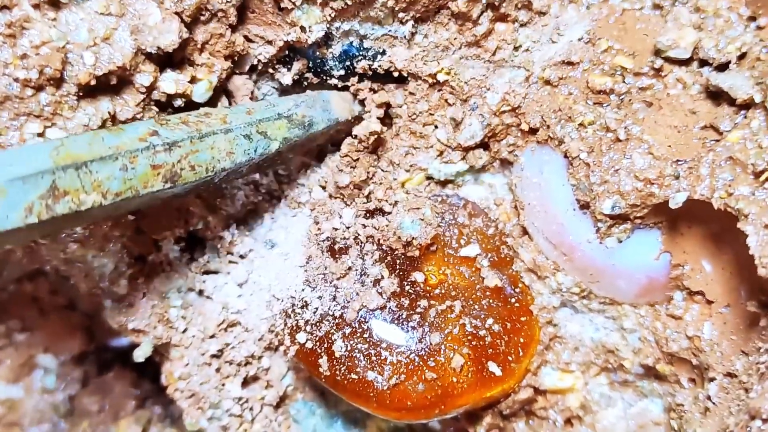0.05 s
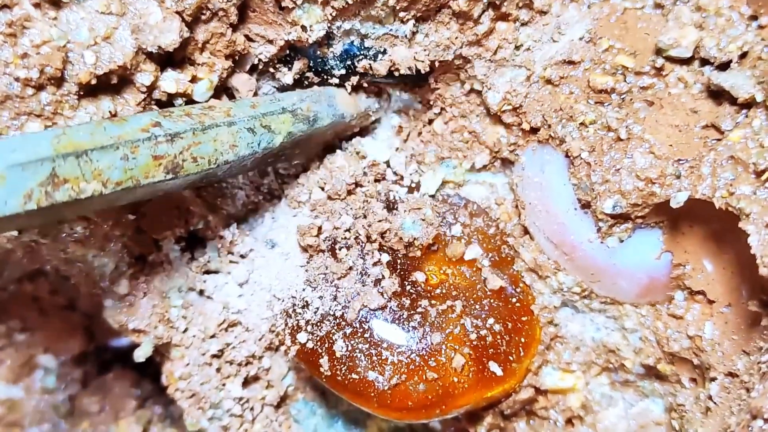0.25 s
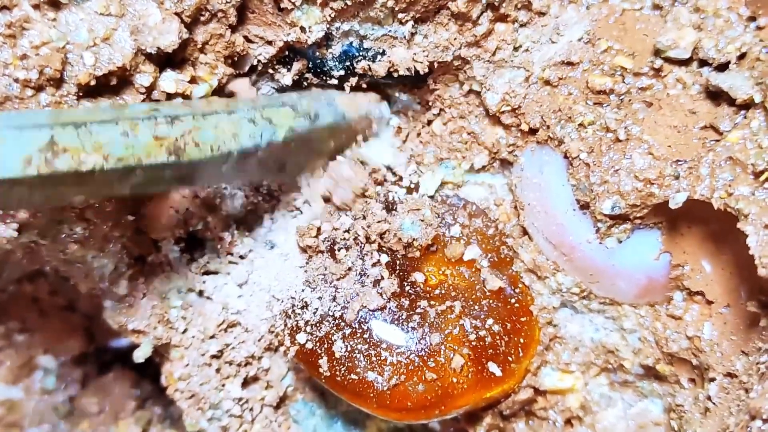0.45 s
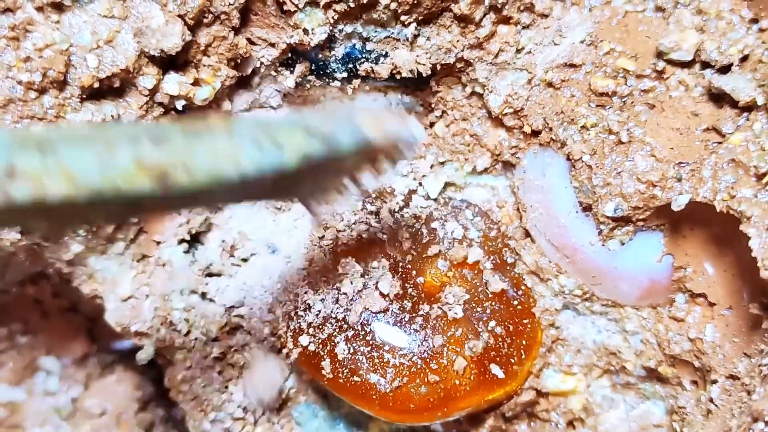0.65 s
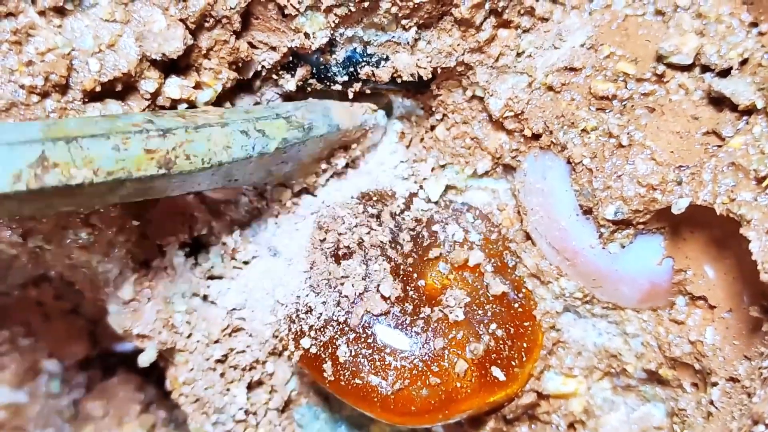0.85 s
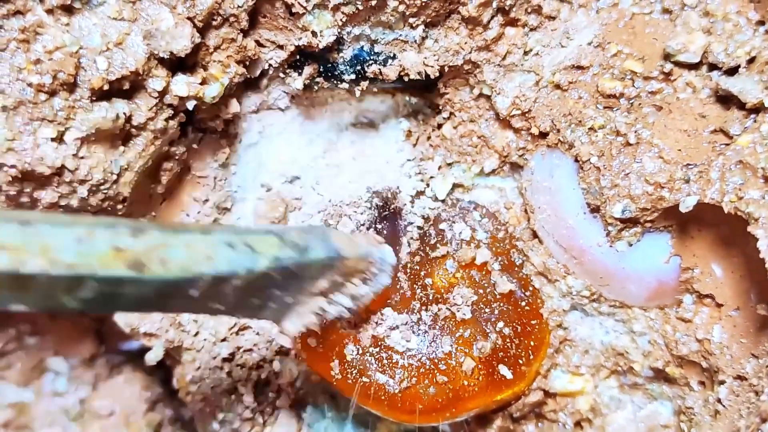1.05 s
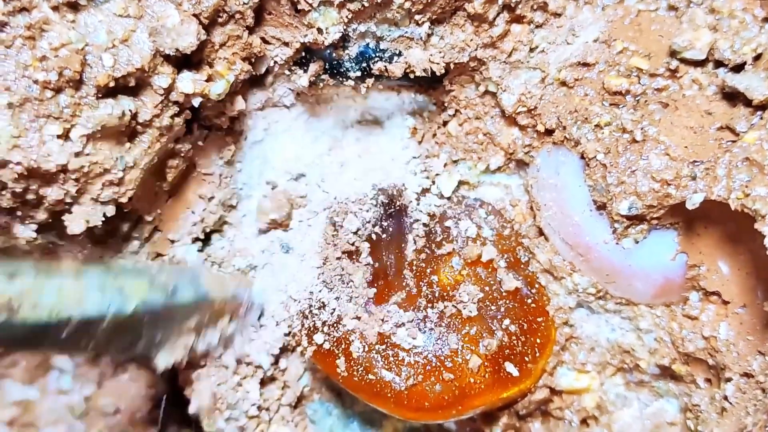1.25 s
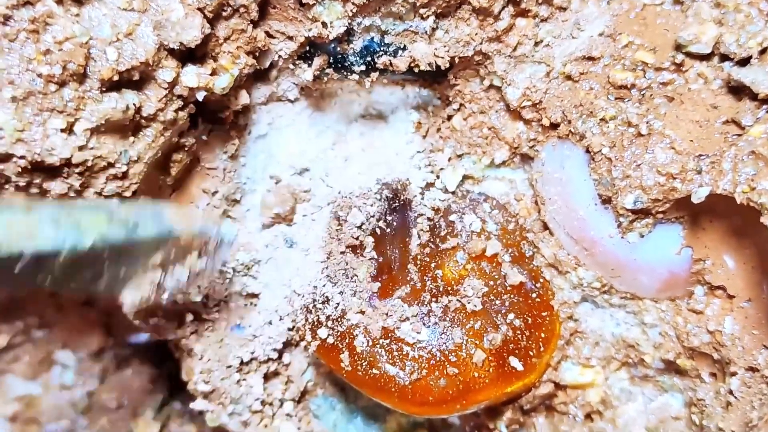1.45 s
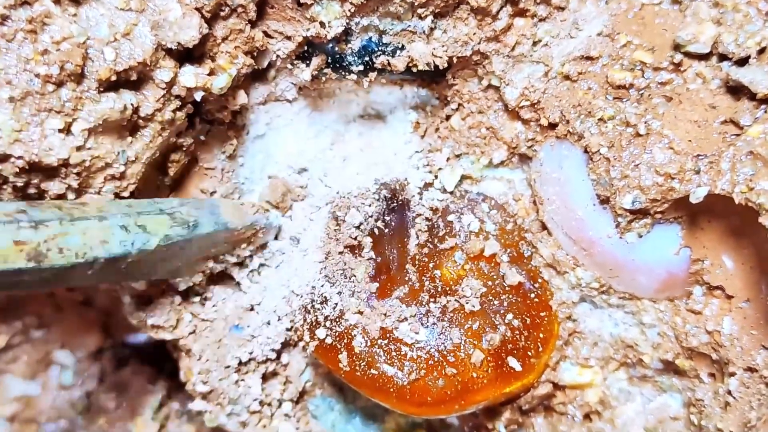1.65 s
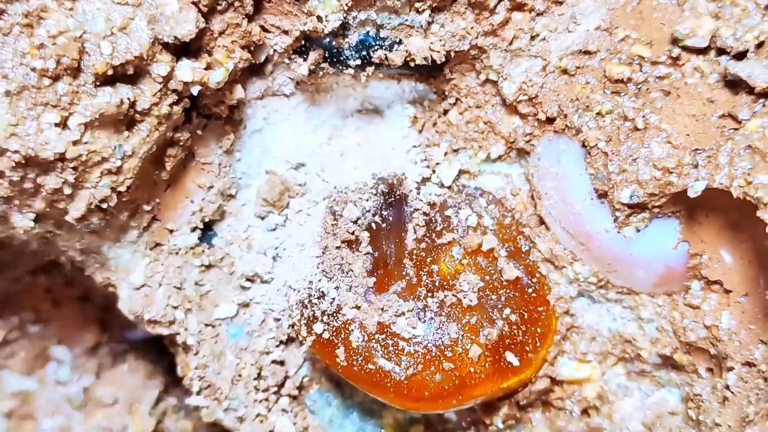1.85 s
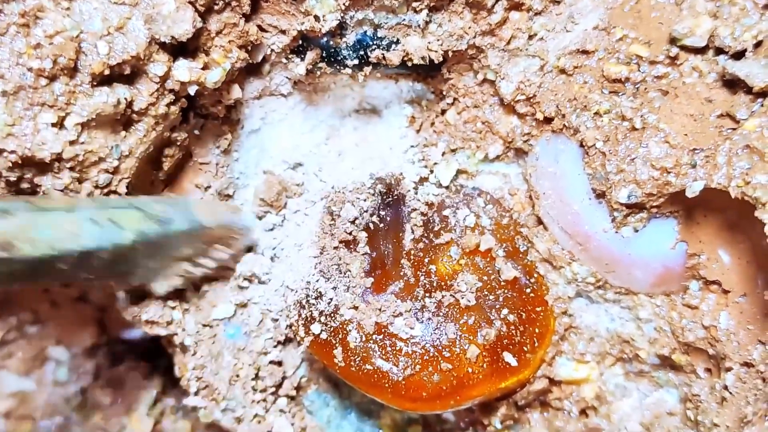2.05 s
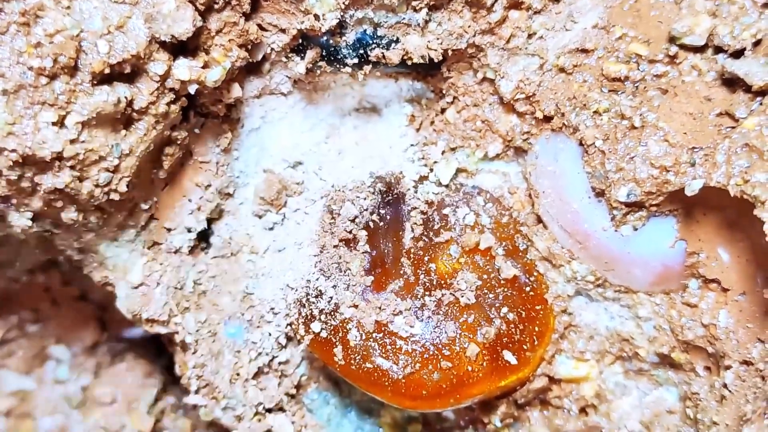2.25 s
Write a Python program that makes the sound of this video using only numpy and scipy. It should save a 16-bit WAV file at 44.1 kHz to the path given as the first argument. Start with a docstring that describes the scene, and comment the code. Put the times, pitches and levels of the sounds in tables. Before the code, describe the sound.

A metal pick crunches through dry dirt with a low thump from the stone beneath. A brush sweeps grit in short strokes, then the tool knocks and chatters over the rock with bright ticks, close up in a quiet room.

```python
"""Picking and brushing dirt off stone

Close up in a quiet, faintly humming room, a steel pick cracks a crust of dry dirt and the
stone slab under it booms. A brush sweeps the grit away in short strokes, snapping loose
grains. A tool knocks and chatters across the rock with bright ticks, and a pebble clinks."""
import sys
import numpy as np
from scipy import signal
from scipy.fft import rfft, irfft
from scipy.io import wavfile

SR = 44100
rng = np.random.default_rng(int(sys.argv[2]) if len(sys.argv) > 2 else 0)


def digitize_waveform(pressure):
    """Quantize a signal to 16-bit integers and store it at the path in sys.argv[1].

    Rows of a 2-D input are taken as channels; values are limited to [-1, 1].
    """
    field = np.atleast_2d(pressure).T
    bounded = np.clip(field, -1, 1)
    quanta = np.round(bounded * 32767).astype(np.int16)
    wavfile.write(sys.argv[1], SR, quanta)


N = 105840
T = np.arange(N) / SR  # seconds into the scene
AGE = T[:SR // 2]  # seconds into one short sound


def amp(db):
    """Turns decibels into a number to multiply by."""
    return 10 ** (np.asarray(db) / 20)


def at_pitch(points, hz):
    """Looks up a table's value at the given frequencies."""
    pitches, values = np.transpose(points)
    return np.interp(np.log(hz + 1), np.log(pitches), values)


def add(mix, start, sound):
    """Lays a sound into the mix, start seconds in."""
    part = mix[max(round(start * SR), 0):][:len(sound)]
    part += sound[:len(part)]


def fade(t60):
    """Dies away by 60 dB in t60 seconds, the 'fade time'."""
    return np.exp(-np.log(1000) * AGE / t60)


def colour(x, tone, size=2048):
    """Makes some pitches stronger than others, as a tone table says."""
    log_gain = np.log(amp(at_pitch(tone, abs(np.fft.fftfreq(size, 1 / SR)))))
    spectrum = np.exp(np.conj(signal.hilbert(log_gain)))  # nothing sounds before its cause
    taps = np.fft.ifft(spectrum).real[:size // 2]
    return signal.fftconvolve(x, taps / np.linalg.norm(taps))[:N]


def cut_bass(x, hz, order):
    """Weakens everything below hz."""
    return signal.sosfilt(signal.butter(order, hz, "high", fs=SR, output="sos"), x)


def burst(t60):
    """A dying cluster of tiny breaks."""
    return rng.choice([-1., 1.], len(AGE)) * (.5 + rng.random(len(AGE))) * fade(t60)


def grains(per_s, spread_db):
    """A random stream of clicks of uneven size."""
    clicks = (rng.random(N) < per_s / SR) * rng.choice([-1., 1.], N)
    clicks *= amp(spread_db * np.minimum(rng.exponential(1, N), 4))
    return clicks / clicks.std()


def push(seconds, rise_s=0.0001):
    """A quick shove of pressure and its slow rebound."""
    progress = AGE / seconds
    return (progress - 1) * np.exp(-progress) * (1 - np.exp(-AGE / rise_s))


def ring(notes):
    """The fading notes of something struck."""
    return -sum(amp(db) * fade(t60) * np.sin(2 * np.pi * hz * AGE) for hz, db, t60 in notes)


def chip(x, hz, ring_db=1):
    """A chip of stone adds its own brief ring to the sound that shakes it."""
    return x + amp(ring_db) * signal.lfilter(*signal.iirpeak(hz, Q=15, fs=SR), x)


# tone of the room's air (frequency [Hz], level [dB])
AIR_TONE = [(20, 16.5), (55, 0), (90, 11.5), (200, 7.5), (500, -2), (1200, -7.5), (3000, -22.5),
            (4800, -22), (7300, -25), (16000, -23.5)]
# the hum swells, then fades (time [s], level [dB])
HUM_LEVELS = [(0, -52), (.3, -46), (.68, -54.5), (.95, -61.5), (2.4, -67)]
def background(air_db=-56, hum_hz=58.2):
    """Quiet room air, partly shared by both sides, and a low hum."""
    left, right, shared = (colour(rng.standard_normal(N), AIR_TONE) for _ in range(3))
    hum_level = amp(np.interp(T, *np.transpose(HUM_LEVELS)))
    hum = hum_level * np.sqrt(2) * np.sin(2 * np.pi * hum_hz * T)
    return amp(air_db) * (np.array([left, right]) + shared) / np.sqrt(2) + hum


CRUMBS_PER_S, CRUMB_SPREAD_DB = 3100, 3.5
# the pick grinds and crumbs trickle after it (time [s], level [dB])
GRIND_LEVELS = [(0, -35), (.065, -52.5), (.12, -64.5), (.222, -61.5), (.228, -16), (.236, -27.5),
                (.246, -18.5), (.273, -19.5), (.281, -31.5), (.34, -50), (.42, -59.5), (.52, -63)]
# the crust cracks (time [s], level [dB], chip pitch [Hz])
CRUST_CRACKS = [(0.2266, -7.5, 3900), (0.2286, -6.5, 3700), (0.2693, -3.5, 2270), (0.2753, -23, 2330)]
# tone of the dry crust (frequency [Hz], level [dB])
CRUST_TONE = [(60, 18.5), (400, 9), (900, -3), (1700, 2.5), (2500, 1.5), (3100, -2.5), (4000, 1),
              (6000, -2.5), (7300, -8.5), (8800, -6.5), (15000, -8.5)]
def pick(spike_db=9):
    """The point grinds through the crust; each crack is a sharp snap and a spray of splinters."""
    cracks = np.zeros(N)
    for start, db, hz in CRUST_CRACKS:
        snap = amp(spike_db) * (AGE == 0)
        splinters = burst(t60=0.0076) * (AGE > 0)
        add(cracks, start, amp(db) * chip(snap + splinters, hz))
    cracks = cut_bass(cracks, hz=900, order=1)
    grind_level = amp(np.interp(T, *np.transpose(GRIND_LEVELS)))
    crumbs = grains(CRUMBS_PER_S, CRUMB_SPREAD_DB) * grind_level
    return colour(cracks + crumbs, CRUST_TONE)


# the crust gives way in jolts (time [s], shove [dB], ring [dB])
PICK_JOLTS = [(0, -23.5, -31), (0.2439, -7, -18), (0.2544, -21.5, -41), (0.2596, -22.5, -18.5),
              (0.2661, 0.5, -25.5)]
# the slab's own notes (pitch [Hz], level [dB], fade time [s])
SLAB_NOTES = [(139, 0, .255), (222, -16, .15), (335, -2, .22), (476, -22, .18), (640, -21, .17)]
def slab():
    """Each jolt of the pick shoves the slab and sets it booming."""
    out = np.zeros(N)
    for start, shove_db, ring_db in PICK_JOLTS:
        add(out, start, amp(shove_db) * push(seconds=0.0017) + amp(ring_db) * ring(SLAB_NOTES))
    return out


# single grains break (time [s], level [dB])
GRAIN_SNAPS = [(0.463, -51), (0.543, -48), (.6255, -40), (.7075, -65), (.7245, -59), (.848, -53),
               (0.884, -38), (0.9669, -37), (1.074, -40), (1.107, -36), (1.1124, -27), (1.305, -37),
               (1.344, -37), (1.431, -29.5), (1.475, -25), (1.504, -29), (1.568, -27), (1.579, -23.5),
               (1.886, -32), (1.905, -23.5), (2.1236, -35), (2.2014, -26.5), (2.3122, -27.5), (2.3272, -28)]
# tone of breaking grit (frequency [Hz], level [dB])
GRIT_TONE = [(50, -7), (150, 12.5), (500, 6), (2400, 0.5), (4000, -0.5), (5000, 5.5), (6000, 1),
             (8500, 2.5), (10500, -4.5), (16000, 2.5)]
def snaps():
    """Loose grains snap under the bristles."""
    out = np.zeros(N)
    for start, db in GRAIN_SNAPS:
        add(out, start, amp(db) * burst(t60=0.0076))
    return colour(out, GRIT_TONE)


# sweeps of the brush (peak time [s], rise [s], fall [s], level [dB], dust above that level [dB])
BRUSH_STROKES = [(0.571, 0.039, 0.03, -59.5, 17.5), (0.619, 0.043, 0.019, -42.5, -4.5),
                 (.945, 0.12, 0.05, -62, 2.5), (0.974, 0.015, 0.037, -49.5, -3.5),
                 (1.116, 0.017, 0.0093, -42.5, 4), (1.15, 0.095, 0.017, -48, -7),
                 (1.375, 0.063, 0.18, -46, -10), (1.58, 0.16, 0.38, -44.5, -13),
                 (1.904, 0.037, 0.023, -37.5, -5), (2.02, 0.051, 0.09, -55, -7),
                 (2.145, 0.068, 0.053, -53, -5.5), (2.233, 0.067, 0.067, -43.5, -13.5),
                 (2.286, 0.012, 0.027, -38.5, -15), (2.319, 0.013, 0.023, -32, -7.5)]
# tone of bristles on coarse grit (frequency [Hz], level [dB])
BRUSH_TONE = [(100, 4), (400, 5.5), (1200, -1), (1900, 6), (2450, 9), (3100, -5), (3700, 2.5), (4700, -0.5),
              (6100, 3), (7200, -36), (8700, -31), (10300, -9), (14000, -13.5), (16000, -12)]
# tone of the fine dust's hiss (frequency [Hz], level [dB])
DUST_TONE = [(1500, -13.5), (4500, -2), (6200, -1.5), (7300, 1.5), (8500, 5), (10300, -9.5), (14000, 3.5),
             (16000, -13.5)]
def brush(edge_db=19):
    """Bristles flick over coarse grit and fine dust, louder as each stroke presses down."""
    grit_power, dust_power = np.zeros((2, N))
    for peak, rise, fall, db, dust_db in BRUSH_STROKES:
        from_peak = np.maximum((peak - T) / rise, (T - peak) / fall)  # 1 at the stroke's edges
        pressure = amp(db - edge_db * from_peak ** 2.43)
        grit_power += pressure ** 2
        dust_power += (pressure * amp(dust_db)) ** 2
    return sum(colour(grains(per_s=5600, spread_db=5.5) * np.sqrt(power), tone)
               for power, tone in [(grit_power, BRUSH_TONE), (dust_power, DUST_TONE)])


# the tool hits the rock (time [s], thud [dB], clack [dB], scrape [dB], chip pitch [Hz])
TOOL_KNOCKS = [(1.108, -41, -60, -40.5, 2420), (1.2376, -37, -31.5, -45, 3400),
               (1.2474, -20, -25, -52, 1740), (1.408, -21.5, -29, -37, 860),
               (1.502, -39, -24.5, -27.5, 610), (1.523, -21, -21.5, -33, 620),
               (1.565, -23.5, -25.5, -26, 655), (1.5793, -27, -24, -29.5, 960),
               (1.593, -18, -30.5, -39, 600), (1.694, -21.5, -32.5, -36, 453),
               (1.7015, -40, -25.5, -30.5, 670), (1.763, -24.5, -44, -32, 480), (1.767, -58, -32, -30, 714)]
# hollow ring under a knock (pitch [Hz], level [dB], fade time [s])
ROCK_NOTES = [(137.4, -1.5, 0.14), (186, -3.5, 0.075), (234.8, 5.5, 0.04), (317, -10, 0.23)]
# tone of the clack (frequency [Hz], level [dB])
CLACK_TONE = [(60, -15.5), (200, 2.5), (420, -3.5), (700, 6.5), (1000, -1.5), (1650, 4.5), (2300, -1.5),
              (4500, -3), (6000, -10.5), (7500, -30), (16000, -29)]
def knocks(hollow_db=-7.5):
    """Each knock of the tool is a low thud, a stony clack and a short gritty scrape."""
    thud, clack, scrape = np.zeros((3, N))
    hollow_thud = push(seconds=0.00072) + amp(hollow_db) * ring(ROCK_NOTES)
    for start, thud_db, clack_db, scrape_db, hz in TOOL_KNOCKS:
        add(thud, start, amp(thud_db) * hollow_thud)
        add(clack, start, amp(clack_db) * chip(burst(t60=0.083), hz))
        add(scrape, start, amp(scrape_db) * burst(t60=0.053))
    scrape *= grains(CRUMBS_PER_S, CRUMB_SPREAD_DB)
    return cut_bass(thud, hz=82.5, order=2) + colour(clack, CLACK_TONE) + colour(scrape, GRIT_TONE)


# the tool's tip touches the stone (time [s], level [dB], ring pitch [Hz])
TIP_TOUCHES = [(1.2385, -26.5, 5590), (1.2487, -27, 3760), (1.2775, -39, 5130), (1.355, -38.5, 5550),
               (1.431, -21, 5520), (1.450, -26, 5300), (1.4697, -25.5, 5000), (1.4943, -19, 5440),
               (1.528, -19, 5300), (1.5443, -16, 5270), (1.567, -15, 5290), (1.597, -35, 5340),
               (1.612, -23.5, 5160), (1.6285, -19, 4840), (1.650, -33, 5100), (1.666, -27.5, 4760),
               (1.7017, -20, 5470), (1.7122, -15.5, 4990), (1.727, -24, 5360), (1.7665, -17, 5430),
               (1.780, -22, 5080), (1.802, -22.5, 5450), (1.838, -38.5, 4700), (1.907, -26, 5870),
               (1.9335, -21.5, 5350), (1.9598, -28, 5410), (1.978, -35, 5130), (2.230, -34, 5100),
               (2.2652, -24.5, 5300), (2.3772, -26.5, 5170)]
# tone of the dry click (frequency [Hz], level [dB])
CLICK_TONE = [(60, -35), (350, 6.5), (750, 7), (1400, -14.5), (4200, -5.5), (5400, -1), (7600, -21),
              (9200, -13), (16000, -32.5)]
# the tip's own notes (pitch [times the ring pitch], level [dB])
TIP_NOTES = [(.95, -10), (1, 0), (1.09, -11)]
def chatter(click_db=-11, rise_s=.0004):
    """The tip skips over the stone; each touch gives a dry click and a tiny ringing ping."""
    clicks, pings = np.zeros((2, N))
    for start, db, hz in TIP_TOUCHES:
        add(clicks, start, amp(db + click_db) * burst(t60=.032))
        ping = ring([(hz * ratio, note_db, .012) for ratio, note_db in TIP_NOTES])  # fades in 12 ms
        add(pings, start, 2 * amp(db) * ping * (1 - np.exp(-AGE / rise_s)))
    return colour(clicks, CLICK_TONE), pings


# the pebble's own notes (pitch [Hz], level [dB], fade time [s])
PEBBLE_NOTES = [(786, -43, 0.1), (871, -39.5, 0.058), (2110, -35.5, 0.029)]
def pebble():
    """A loose pebble taps the rock once and clinks."""
    out = np.zeros(N)
    add(out, start=2.02, sound=ring(PEBBLE_NOTES))
    return out


# how long the room rings (frequency [Hz], fade time [s])
ROOM_FADES = [(100, 0.31), (400, 0.27), (1000, 0.077), (2500, 0.15), (6000, 0.24), (15000, 0.17)]
def echo(room_db=-11, room_rise_s=0.019, near_db=-1.5, near_s=.0011):
    """Quick bounces off the nearby rock and a short room echo, from one spot to one microphone."""
    hz, t, noise = signal.stft(rng.standard_normal(len(AGE)), SR, nperseg=256)
    fading = np.exp(-np.log(1000) * t / at_pitch(ROOM_FADES, hz)[:, None])
    tail = signal.istft(noise * fading, SR, nperseg=256)[1][:len(AGE)]
    tail *= np.minimum(AGE / room_rise_s, 1)
    near = rng.standard_normal(len(AGE)) * AGE * np.exp(-AGE * np.pi / near_s)
    near = cut_bass(near, hz=500, order=2)
    return amp(room_db) * tail / np.linalg.norm(tail) + amp(near_db) * near / np.linalg.norm(near)


def scatter(x, spots=6, spot_s=.011):
    """The point of contact keeps moving, so the grit's echoes pass from spot to spot."""
    grit = cut_bass(x, hz=150, order=1)
    out = x
    for spot in range(spots):
        away = abs((T / spot_s - spot) % spots - spots / 2)
        share = np.cos(np.pi / 2 * np.minimum(away, 1))
        out = out + signal.oaconvolve(grit * share, echo())[:N]
    return out


# how much louder the right side is than the left (frequency [Hz], level [dB])
RIGHT_BOOST = [(100, -0.5), (1200, 3.5), (2500, 0.5), (6000, 8), (8000, 2), (15000, -4.5)]
def scene(brush_left_db=3, right_lag_s=.00032):
    """Gritty sounds echo off the rock; all reach two close microphones, the right one a bit later."""
    stone = pick() + knocks()
    clicks, pings = chatter()
    stone += clicks
    sweep = snaps() + brush()
    rings = slab() + pings + pebble()
    nearer = amp(brush_left_db / 2)  # the brush works nearer the left microphone
    both = np.array([scatter(stone + sweep * nearer), scatter(stone + sweep / nearer)]) + rings
    hz = np.fft.rfftfreq(2 * N, 1 / SR)
    lean_right = amp(at_pitch(RIGHT_BOOST, hz) / 2)
    delay = np.exp(-2j * np.pi * hz * right_lag_s)
    microphones = np.array([1 / lean_right, lean_right * delay])
    return irfft(rfft(both, 2 * N) * microphones)[:, :N] + background()


def record(dry, ceiling=.95, top_hz=15650):
    """Rounds off the loudest peaks and cuts the very highest treble."""
    rounded = ceiling * np.tanh(dry / ceiling)
    treble_cut = signal.firwin(255, top_hz, window=("kaiser", 9), fs=SR)
    return signal.oaconvolve(rounded, treble_cut[None], "same")


dry = scene()
out = record(dry)
digitize_waveform(out)
```